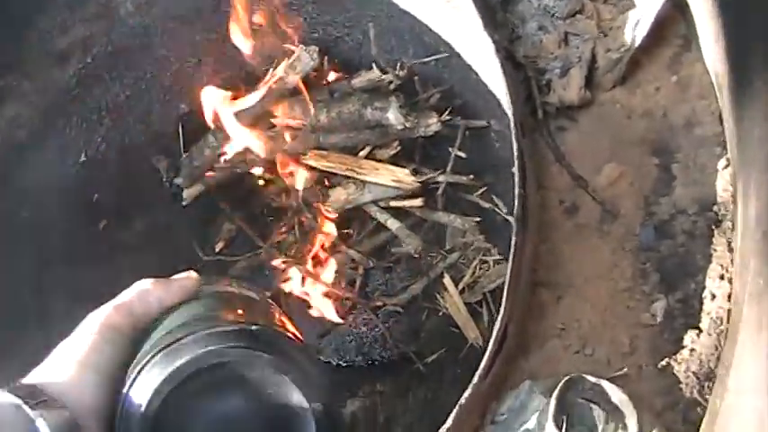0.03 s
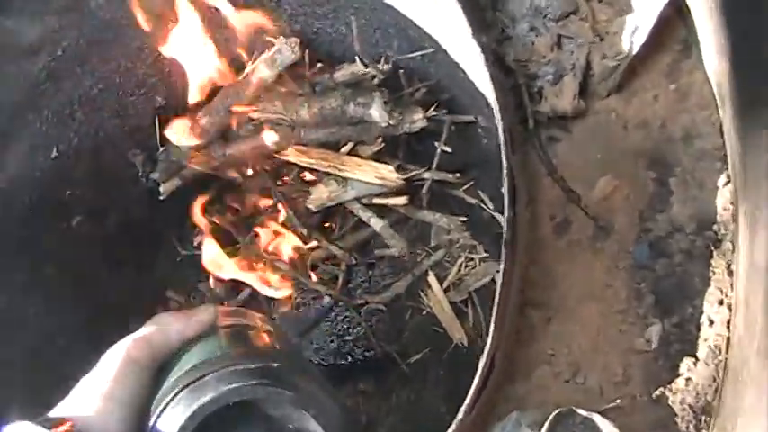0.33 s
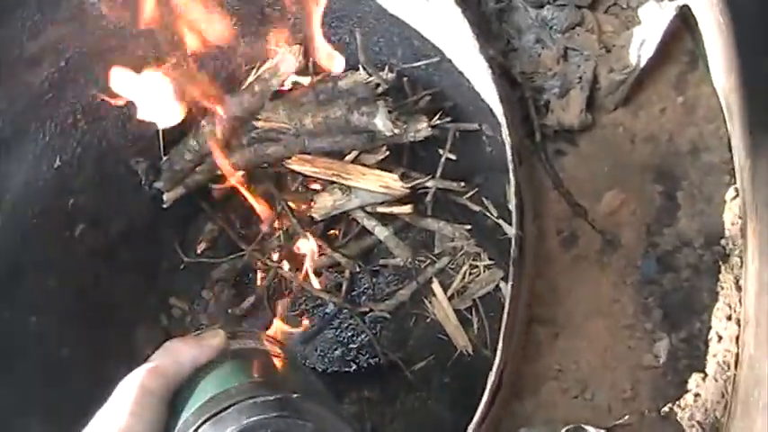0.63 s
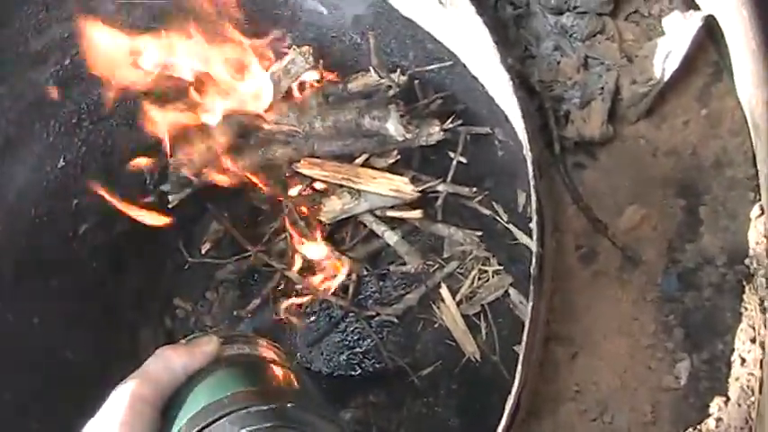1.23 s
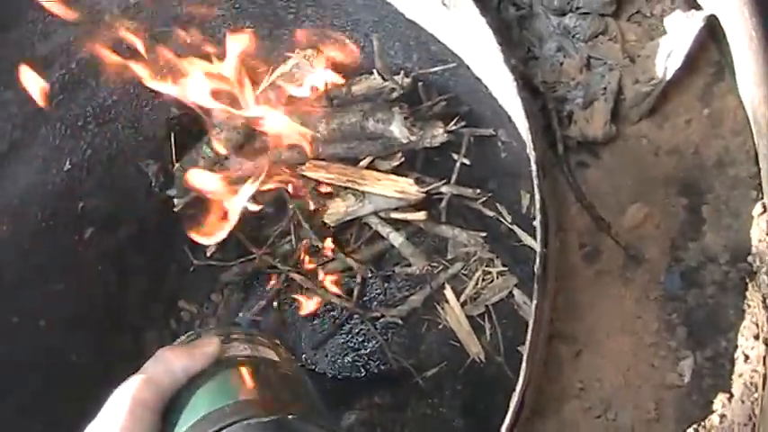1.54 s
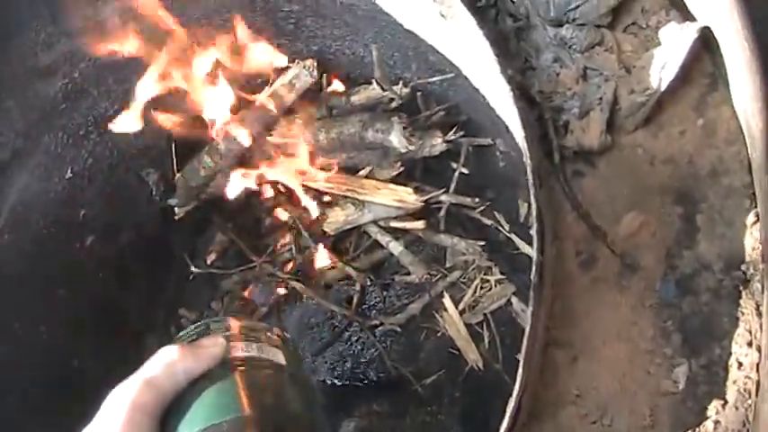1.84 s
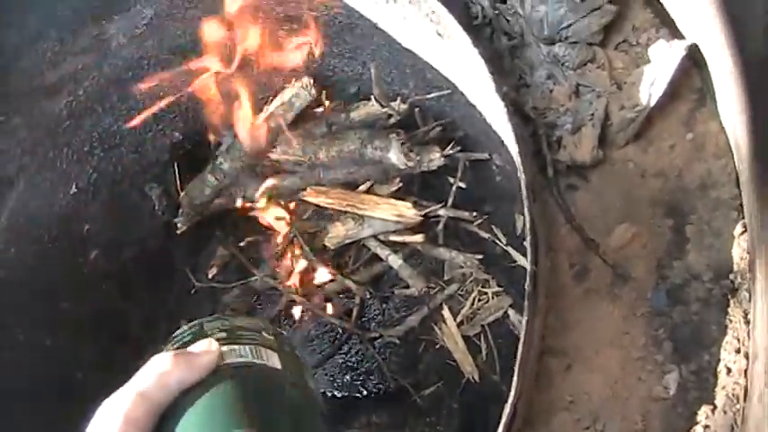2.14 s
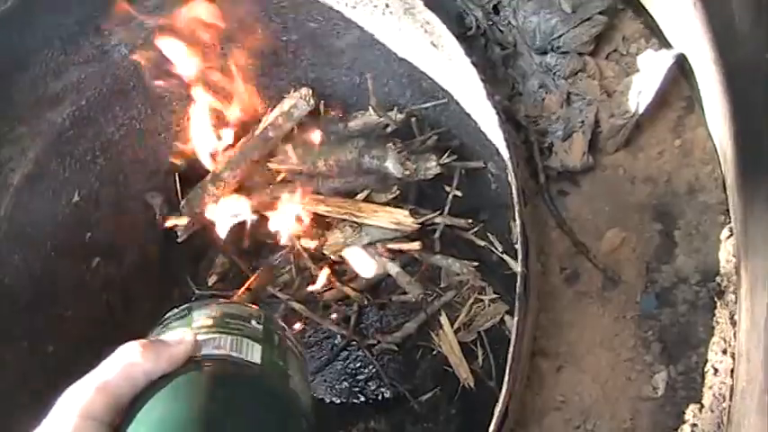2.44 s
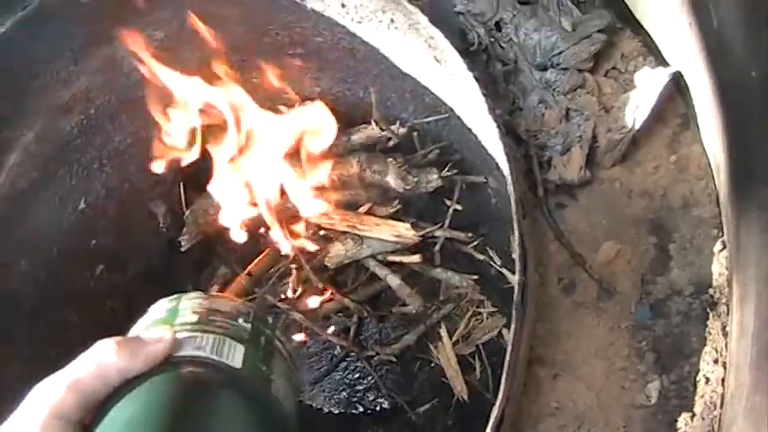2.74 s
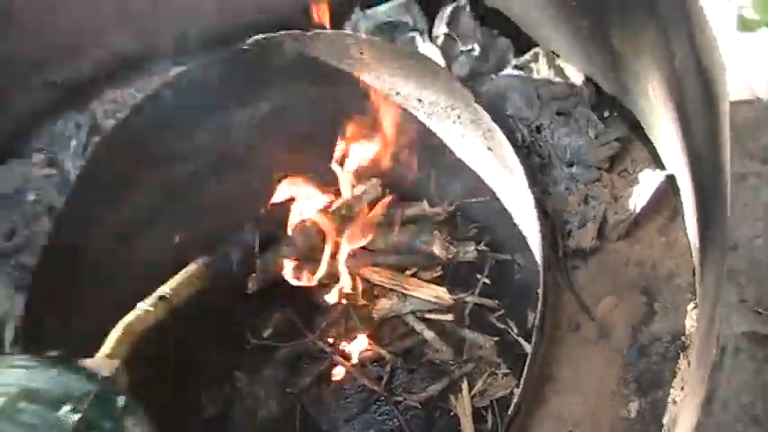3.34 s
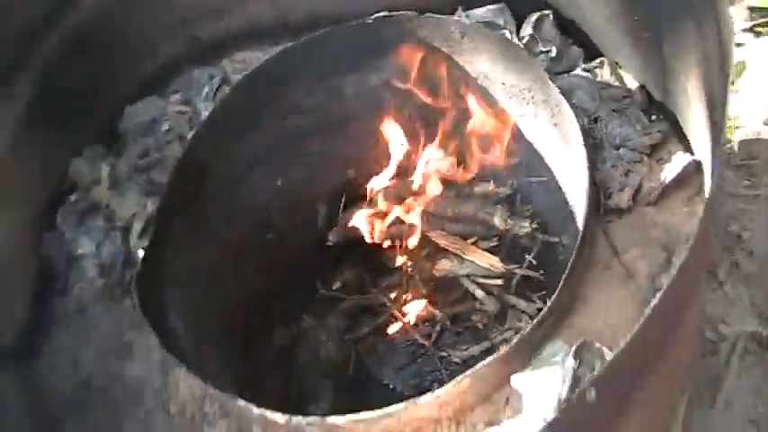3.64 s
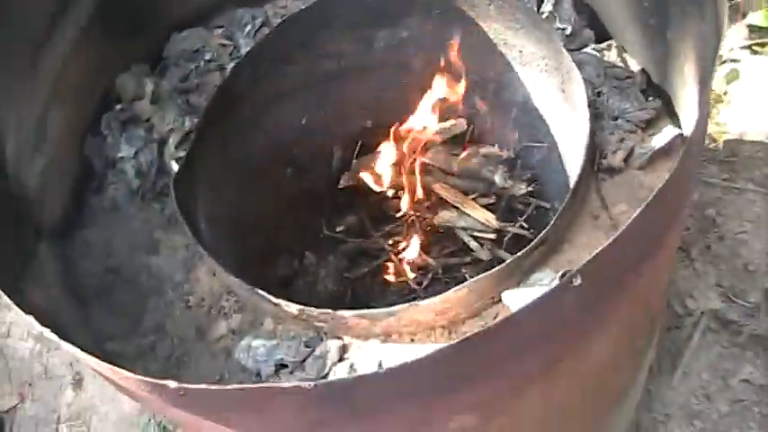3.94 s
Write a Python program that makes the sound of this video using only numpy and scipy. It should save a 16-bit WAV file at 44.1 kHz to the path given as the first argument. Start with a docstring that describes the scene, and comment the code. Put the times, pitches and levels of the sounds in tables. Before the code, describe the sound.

A wood fire rumbles and flutters in a steel drum, with sizzling sap, thin squeaks and scattered snaps, the sharpest at 0.8 seconds. A distant insect rasps in swells. A hollow puff comes at 2.3 seconds, poured fuel spatters faintly from 2.5 to 3, and a hissing puff follows. From 3.2 to 3.8 the fire flares in a roaring whoosh with dull pops, then settles with one crack.

```python
"""A wood fire burns in a steel drum outdoors, heard from just above it.
Turbulent flames drive the drum's resonances, rumbling, fluttering and popping, while boiling sap
sizzles and squeaks out of the cracking sticks. A distant insect rasps in swells.
Poured fuel spatters and catches in two short puffs, then in a long whoosh as the microphone draws back.
Reflections from the steel walls colour the whole sound."""
import sys
import numpy as np
from scipy import signal
from scipy.fft import rfft, irfft
from scipy.io import wavfile

SR = 44100
rng = np.random.default_rng(int(sys.argv[2]) if len(sys.argv) > 2 else 0)


def wav_record(signal):
    """Record a signal, one row per channel, as 16-bit PCM in the file named by sys.argv[1]."""
    frames = np.transpose(np.atleast_2d(signal))
    bounded = np.clip(frames, -1, 1)
    # unit amplitude maps onto the largest positive 16-bit level
    quanta = np.round(bounded * 32767).astype(np.int16)
    wavfile.write(sys.argv[1], SR, quanta)


N = 176400
TIME = np.arange(N) / SR


def amp(db):
    """Amplitude ratio of a level in decibels."""
    return 10 ** (np.asarray(db) / 20)


def unit(x):
    """Normalisation to an rms of 1."""
    return x / np.sqrt(np.mean(x ** 2) + 1e-20)


def at_frequency(table, hz):
    """Interpolation of a table on a logarithmic frequency axis."""
    f, value = np.transpose(table)
    return np.interp(np.log(hz + 1), np.log(f + 1), value)


def curve(table, column=1):
    """Linear interpolation of one column of a time table at every sample."""
    rows = np.array(table)
    return np.interp(TIME, rows[:, 0], rows[:, column])


def add(mix, start_s, sound):
    """Superposition of a stereo sound on the mix."""
    part = mix[:, round(start_s * SR):][:, :sound.shape[1]]
    part += sound[:, :part.shape[1]]


def delayed(x, delay_s):
    """Propagation delay, which may vary with time."""
    return np.array([np.interp(TIME - delay_s, TIME, channel) for channel in x])


def drift(rate_hz):
    """Slow random fluctuation: low-passed noise of rms 1."""
    hz = np.fft.rfftfreq(N, 1 / SR)
    lowpass = (hz > 0) / (1 + (hz / rate_hz) ** 2)
    return unit(irfft(rfft(rng.standard_normal(N)) * lowpass, N))


def colour(x, spectrum, tilt_db=0):
    """Minimum-phase filter of unit energy, so only the spectrum's shape counts; tilt is per octave."""
    hz = abs(np.fft.fftfreq(4096, 1 / SR))
    log_gain = np.log(amp(at_frequency(spectrum, hz) + tilt_db * np.log2(hz / SR + .001)))
    taps = np.fft.ifft(np.exp(np.conj(signal.hilbert(log_gain)))).real
    return signal.fftconvolve(x, taps[None] / np.linalg.norm(taps), axes=1)[:, :x.shape[1]]


def turbulence(per_s, range_db, share, flicker_db, flicker_hz):
    """Shot noise, with the given share of the power, and Gaussian noise under one random modulation."""
    sizes = amp(range_db * np.minimum(rng.exponential(1, N), 4))
    occurs = rng.random(N) < per_s / SR
    clicks = unit(sizes * occurs * rng.choice([-1., 1.], (2, N)))
    noise = np.sqrt(share) * clicks + np.sqrt(1 - share) * rng.standard_normal((2, N))
    return unit(noise * amp(flicker_db * drift(flicker_hz)))


def jet(hz, width_hz, wander):
    """Narrow-band noise on a carrier whose frequency drifts by the fraction `wander`."""
    pole = np.exp(-np.pi * width_hz / SR)
    noise = rng.standard_normal((2, N)) + 1j * rng.standard_normal((2, N))
    baseband = signal.lfilter([1], [1, -2 * pole, pole * pole], noise)
    centre_hz = hz * (1 + wander * drift(rate_hz=6))
    return unit((baseband * np.exp(2j * np.pi * np.cumsum(centre_hz) / SR)).real)


def shimmer(x, depth_db, patch_hz, patch_s):
    """Random amplitude modulation in patches of time and frequency: the sound flickers."""
    hz, t, spectra = signal.stft(x, SR, nperseg=1024, noverlap=768)
    patches = rng.standard_normal(spectra.shape[1:])
    for axis, steps in enumerate([patch_hz / hz[1], patch_s / t[1]]):
        pole = np.exp(-1 / steps)
        patches = signal.filtfilt([1 - pole], [1, -pole], patches, axis=axis, padtype="even")
    gain = amp(depth_db * np.clip(unit(patches), -2, 2))
    return signal.istft(spectra * gain, SR, nperseg=1024, noverlap=768)[1][:, :N]


# Spectra of the burning gas and of the flame tips: f/Hz, relative level/dB
RUMBLE_SPECTRUM = [(15, -54), (25, -21), (91, -14.5), (156, 2.5), (208, -3), (291, -8), (358, -13.5),
                   (397, -37), (432, -28.5), (469, -19.5), (554, -37), (682, -18), (857, -36), (1170, -30),
                   (1410, -42.5), (1700, -36.5), (2530, -34.5), (3600, -44.5), (6000, -100)]
FLUTTER_SPECTRUM = [(200, -26), (470, -6.5), (550, -6), (670, 2.5), (880, -10), (1130, -5.5), (1400, -13.5),
                    (1800, -22.5), (6000, -42.5)]
# Strength of the flames: t/s, rumble level/dB, flutter level/dB
FLAME_LEVELS = [(0, -27, -44.5), (.2, -26.5, -37), (1.25, -23, -33.5), (1.62, -24.5, -35),
                (1.78, -25.5, -44.5), (1.93, -25, -38.5), (2.15, -24.5, -44.5), (2.38, -24, -51),
                (2.6, -27, -44), (2.95, -27, -53), (3.14, -22.5, -31.5), (3.19, -33.5, -44.5),
                (3.29, -23, -33.5), (3.6, -32, -26), (3.8, -33, -38), (4, -36, -42)]


def flames():
    """Forced resonance: burning gas drives the drum's low modes, and flame tips flap above them."""
    gas = turbulence(per_s=600, range_db=1.5, share=0.25, flicker_db=1.43, flicker_hz=13)
    tips = turbulence(per_s=520, range_db=1.5, share=0.6, flicker_db=0.5, flicker_hz=30)
    rumble = colour(gas, RUMBLE_SPECTRUM) * amp(curve(FLAME_LEVELS, column=1))
    flutter = colour(tips, FLUTTER_SPECTRUM) * amp(curve(FLAME_LEVELS, column=2))
    return rumble + flutter


# Spectrum of boiling sap: f/Hz, relative level/dB
SIZZLE_SPECTRUM = [(900, -28), (2300, -20.5), (3300, -5), (4200, -4), (6200, -8), (7600, -1.5),
                   (9000, -8.5), (10000, -2.5), (11800, -4), (13200, -1.5), (15600, -11)]
# Strength of the boiling and of the lower steam jet: t/s, level/dB
SIZZLE_LEVELS = [(0, -38), (1.25, -38.5), (2.1, -40.5), (2.45, -42), (3.2, -40), (3.7, -36.5), (4, -40)]
LOW_JET_LEVELS = [(0, -40.5), (.55, -45), (1.0, -42), (1.3, -44), (2.1, -47.5), (3.2, -47), (3.8, -47.5)]
# Thin whistle of steam: t/s, f/Hz, level/dB
STEAM_WHISTLE = [(0, 4800, -48), (1.1, 4620, -47.5), (1.72, 4550, -46.5), (1.87, 4560, -53),
                 (3.0, 4600, -50), (4, 4600, -55)]


def sizzle():
    """Vaporisation: sap boils out of the sticks as fine ticks, two steady jets and a thin whistle."""
    boiling = turbulence(per_s=260, range_db=3.4, share=0.21, flicker_db=0.5, flicker_hz=16)
    ticks = colour(boiling, SIZZLE_SPECTRUM)
    high_jet = jet(hz=8680, width_hz=1850, wander=.016) * amp(-1 + drift(rate_hz=32))
    low_jet = jet(hz=4950, width_hz=1150, wander=.01) * amp(curve(LOW_JET_LEVELS))
    whistle = jet(hz=curve(STEAM_WHISTLE), width_hz=250, wander=0.00591)
    whistle *= amp(curve(STEAM_WHISTLE, column=2) + 1.4 * drift(rate_hz=25))
    return (ticks + high_jet) * amp(curve(SIZZLE_LEVELS)) + low_jet + whistle


# Spectrum of snapping wood: f/Hz, relative level/dB
CRACK_SPECTRUM = [(500, -74), (1300, -1.5), (3000, 1), (4800, 4.5), (6500, 1.5), (8500, 4), (10500, -4),
                  (13500, -4.5), (16000, -8)]
# Snaps of the sticks: t/s, relative level/dB, tilt/(dB per octave)
WOOD_CRACKS = [(.079, -33, -3), (.279, -28, -1.5), (.462, -31.5, -3), (.628, -37, 3), (.7936, -21.3, .5),
               (1.281, -37, -1), (1.5481, -32.5, -4.5), (2.6254, -30.5, 3), (2.829, -34, 0),
               (2.865, -36, -5), (3.069, -32, -9), (3.8542, -24.5, -1.5)]


def cracks(snap=3.8, decay_s=0.0044, tail_s=0.04, tail_db=-19, gain_db=2):
    """Impulsive excitation: wood snaps in a single push, and its scatter in the drum decays quickly."""
    out, t = np.zeros((2, N)), TIME[:SR // 10]
    decay = np.exp(-t / decay_s) + amp(tail_db) * np.exp(-t / tail_s)
    for start, db, tilt_db in WOOD_CRACKS:
        burst = snap * (t == 0) + rng.choice([-1., 1.], (2, len(t))) * decay
        add(out, start, amp(db + gain_db) * colour(burst, CRACK_SPECTRUM, tilt_db))
    return out


# Venting pockets of sap: onset t/s, duration/s, f/Hz, nominal bandwidth/Hz, greatest level/dB
SAP_SPURTS = [(.59, .16, 9150, 800, -39), (1.15, .17, 9050, 700, -34.5), (1.18, .1, 13000, 2200, -41),
              (1.35, .3, 9250, 1300, -39.5), (1.78, .38, 12850, 900, -42.5), (1.99, .11, 8850, 350, -35.5),
              (2.13, .11, 14900, 1300, -40), (2.15, .16, 11200, 800, -41.5), (2.64, .2, 8700, 450, -39.5),
              (3.85, .25, 2200, 550, -45.5)]


def spurts():
    """Jet noise: as a pocket of sap vents, a narrow squeak swells, wavers and dies."""
    out = np.zeros((2, N))
    for start, duration, hz, width_hz, db in SAP_SPURTS:
        swell = np.sin(np.pi * np.clip((TIME - start) / duration, 0, 1))
        out += jet(hz, width_hz, wander=0.011) * amp(db) * swell
    return out


# Spectrum of the insect's rasp: f/Hz, relative level/dB
RASP_SPECTRUM = [(3000, -50), (3720, -26), (3960, -1.5), (4800, -5), (6600, 1), (8100, -4.5), (9000, -9),
                 (10000, -24), (15000, -40)]
# Swells of the rasp: full strength at t/s, hold/s, level/dB
RASP_SWELLS = [(1.07, .105, -30.8), (2.28, .125, -31.3), (3.6, .075, -32)]


def insect(rise_s=.26, fall_s=.058):
    """Amplitude-modulated noise: a smooth, dry rasp swells slowly, holds and stops quickly."""
    envelope = np.zeros(N)
    for full_at, hold, db in RASP_SWELLS:
        rise = np.maximum(full_at - TIME, 0) / rise_s
        fall = np.maximum(TIME - full_at - hold, 0) / fall_s
        envelope += amp(db) * np.exp(-rise ** 2 - fall ** 2)
    return envelope * colour(rng.standard_normal((2, N)), RASP_SPECTRUM)


# Spectrum of a flame pop: f/Hz, relative level/dB
POP_SPECTRUM = [(80, -5), (250, 13), (700, -4.5), (1150, 1), (1600, -18), (2000, -5), (3500, -27),
                (8000, -40)]
# Pops of the flames: t/s, relative level/dB
FLAME_POPS = [(1.917, -27), (2.083, -27.5), (2.703, -23.5), (3.498, -17.5), (3.66, -18), (3.803, -28)]


def pops(scatter=0.059, decay_s=0.0027, gain_db=22):
    """Pressure pulses: a flame gives one dull push, followed by brief scatter in the drum."""
    out, t = np.zeros((2, N)), TIME[:SR // 10]
    for start, db in FLAME_POPS:
        burst = (t == 0) + scatter * rng.choice([-1., 1.], (2, len(t))) * np.exp(-t / decay_s)
        add(out, start, amp(db + gain_db) * colour(burst, POP_SPECTRUM))
    return out


# Echo from the drum wall: t/s, delay/ms
WALL_DELAYS = [(2.3, 1.58), (3.2, 1.09), (3.42, 1.4), (3.7, 1.69)]


def wall_echo(x, first_gain=.36, second_gain=-.3):
    """Comb filtering: two echoes inside the drum slide as the microphone moves."""
    delay_s = curve(WALL_DELAYS) / 1000
    return x + first_gain * delayed(x, delay_s) + second_gain * delayed(x, 2 * delay_s)


# Spectra of igniting fuel, its thump and its hiss (also in the whoosh): f/Hz, relative level/dB
THUMP_SPECTRUM = [(50, -31), (120, -2), (190, 3.5), (345, 0), (430, -24), (510, -16), (580, -18), (700, -6),
                  (830, -20.5), (980, -17.5), (1300, -23), (1530, -30), (1900, -16.5), (2250, -27),
                  (2600, -25.5), (4000, -28.5), (8000, -64)]
FUEL_HISS_SPECTRUM = [(150, -17), (450, 4), (680, 9), (1000, -3), (1900, 2), (2900, -4), (4300, -5),
                      (5400, -10.5), (8400, -9.5), (10000, -20), (13000, -22), (16000, -34)]
# Ignitions, the last two merging into one puff: centre t/s, thump level/dB, half-width/s, hiss level/dB
FUEL_PUFFS = [(2.271, -17, 0.028, -48), (3.118, -32, 0.01, -29.5), (3.153, -32, 0.023, -29.5)]


def puffs(skirt=.13):
    """Transient combustion: small doses of fuel catch with a hollow thump and a short hiss."""
    thump = turbulence(per_s=1000, range_db=0.5, share=0.98, flicker_db=0.5, flicker_hz=59)
    thump = colour(thump, THUMP_SPECTRUM)
    hiss = turbulence(per_s=500, range_db=-1, share=0.52, flicker_db=2.0, flicker_hz=60)
    hiss = wall_echo(colour(hiss, FUEL_HISS_SPECTRUM))
    out = np.zeros((2, N))
    for centre, thump_db, half_width, hiss_db in FUEL_PUFFS:
        offset = (TIME - centre) / half_width
        swell = np.exp(-offset ** 2) + skirt * np.exp(-(offset / 2) ** 2)
        swell_rms = np.sqrt(np.mean(swell ** 2))
        out += swell_rms * (amp(thump_db) * unit(thump * swell) + amp(hiss_db) * unit(hiss * swell))
    return out


# Spectrum of fuel striking the sticks: f/Hz, relative level/dB
SPATTER_SPECTRUM = [(400, -28), (700, 6), (1150, 10.5), (1500, -4), (1920, 10.5), (2250, -34), (2600, 6.5),
                    (3000, -8), (10000, -26)]


def pour(start_s=2.52, end_s=2.995, rise_s=0.01, fall_s=0.072, level_db=-44.5):
    """Impact noise: a thin stream of fuel spatters on the sticks."""
    flow = np.clip((TIME - start_s) / rise_s, 0, 1) * np.clip((end_s - TIME) / fall_s + 1, 0, 1)
    drops = turbulence(per_s=131, range_db=0, share=0.57, flicker_db=1.5, flicker_hz=25)
    return amp(level_db) * flow * colour(drops, SPATTER_SPECTRUM)


# Spectrum of the flare's roar: f/Hz, relative level/dB
ROAR_SPECTRUM = [(50, -27), (130, -18.5), (260, 2.5), (370, 1.5), (450, -7), (600, -6), (820, -2),
                 (1050, -12.5), (1400, -11.5), (4000, -41)]
# Strength of the flare: t/s, roar level/dB, hiss level/dB
FLARE_LEVELS = [(3.19, -70, -65), (3.22, -52, -35), (3.265, -33, -25.5), (3.39, -26.5, -24.5),
                (3.5, -19, -24), (3.555, -17.5, -22.7), (3.62, -22, -24.8), (3.668, -22.5, -25.5),
                (3.682, -28.5, -35), (3.75, -33, -43), (3.79, -42, -51), (3.95, -62, -65)]


def whoosh():
    """Turbulent combustion: the stream of fuel flares, a tearing hiss first, then a ragged roar."""
    roar = turbulence(per_s=1100, range_db=2.5, share=0.87, flicker_db=2.5, flicker_hz=40)
    roar = colour(roar, ROAR_SPECTRUM) * amp(curve(FLARE_LEVELS, column=1))
    hiss = turbulence(per_s=1800, range_db=2.5, share=0.58, flicker_db=0.5, flicker_hz=60)
    hiss = colour(hiss, FUEL_HISS_SPECTRUM) * amp(curve(FLARE_LEVELS, column=2))
    return wall_echo(roar + hiss)


def rim_shadow(x, at_s=3.3, fade_s=.05, above_hz=9000, gain_db=-8.5):
    """Acoustic shadow: once the microphone has drawn back, the drum's rim screens the finest hiss."""
    low = signal.sosfiltfilt(signal.butter(4, above_hz, fs=SR, output="sos"), x)
    shaded = np.clip((TIME - at_s) / fade_s + .5, 0, 1)
    return low + (x - low) * amp(gain_db * shaded)


def drum(x, count=7, span_ms=(2, 13), total_db=-11.5, sway=0.0091, above_hz=1500):
    """Early reflections from the steel walls; their paths sway with the hand-held microphone."""
    delays_s = np.geomspace(*span_ms, count) * rng.uniform(.88, 1.12, count) / 1000
    highpass = signal.butter(1, above_hz, "high", fs=SR)
    out = x.copy()
    for delay_s, sign in zip(delays_s, rng.choice([-1, 1], count)):
        echo = delayed(x, delay_s * (1 + sway * drift(rate_hz=2)))
        out += sign * amp(total_db) / np.sqrt(count) * signal.lfilter(*highpass, echo)
    return out


def spread(pair, coherence):
    """Partial coherence: two unrelated signals, as mid and side, give left and right a set likeness."""
    likeness = at_frequency(coherence, np.fft.rfftfreq(N, 1 / SR))
    mid, side = irfft(rfft(pair) * np.sqrt([(1 + likeness) / 2, (1 - likeness) / 2]), N)
    return np.array([mid + side, mid - side])


# Likeness of left and right for the fire and for the flare: f/Hz, correlation coefficient
FIRE_COHERENCE = [(25, -0.4), (60, 0.5), (120, 1), (1000, 0.97), (2400, 0.83), (8100, 0.6), (12000, 0.042)]
FLARE_COHERENCE = [(700, 0.99), (4000, 0.89), (8000, 0.56), (13000, 0.6)]


def scene(lean_db=0.56):
    """Superposition: the fire is nearly central in the bass, wide in the treble; the flare leans left."""
    sap = shimmer(rim_shadow(sizzle()) + spurts(), depth_db=2.5, patch_hz=220, patch_s=0.033)
    rasp = shimmer(insect(), depth_db=2.5, patch_hz=50, patch_s=0.15)
    fire = spread(flames() + sap + rasp + pour() + puffs() + cracks() + pops(), FIRE_COHERENCE)
    flare = spread(shimmer(whoosh(), depth_db=2.0, patch_hz=51, patch_s=0.028), FLARE_COHERENCE)
    return drum(fire + flare * amp([[lean_db], [-lean_db]]))


# Turn of the microphone as it draws back: t/s, lag of the right channel/microseconds
RIGHT_LAG = [(3.35, -2), (3.62, 31), (3.85, 43)]


def record(dry, cutoff_hz=15700, oversample=8):
    """Arrival-time difference: the right channel lags as the microphone turns; both are band-limited."""
    fine = signal.resample_poly(dry[1], oversample, 1)
    fine_time = np.arange(oversample * N) / (oversample * SR)
    right = np.interp(TIME - curve(RIGHT_LAG) / 1e6, fine_time, fine)
    lowpass = signal.firwin(511, cutoff_hz, window=("kaiser", 9), fs=SR)
    return signal.oaconvolve(np.array([dry[0], right]), lowpass[None], "same")


dry = scene()
out = record(dry)
wav_record(out)
```